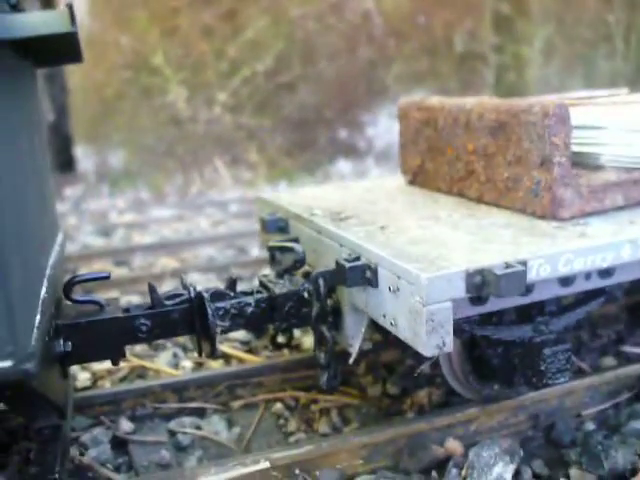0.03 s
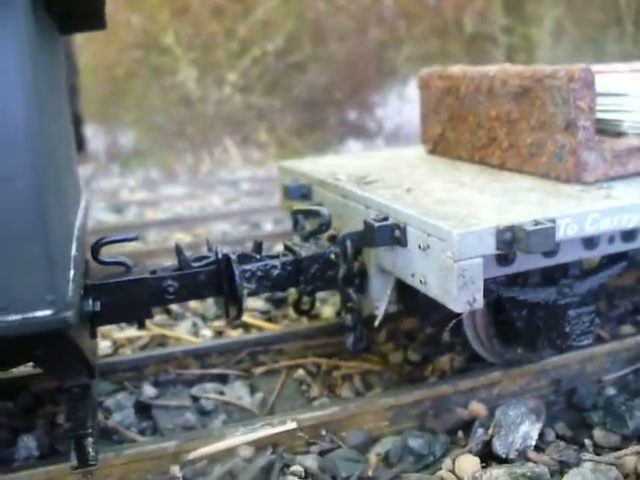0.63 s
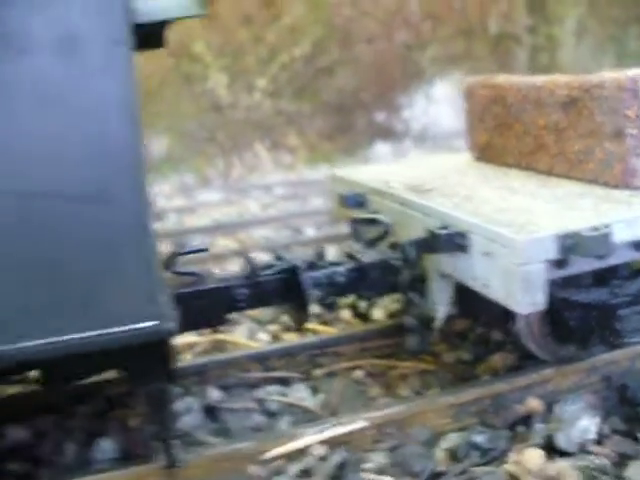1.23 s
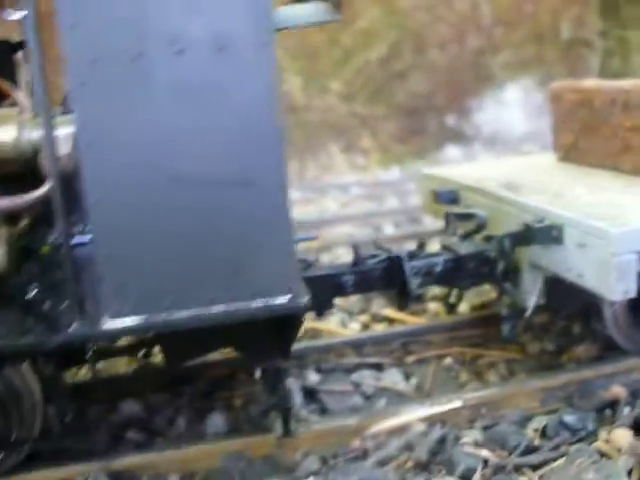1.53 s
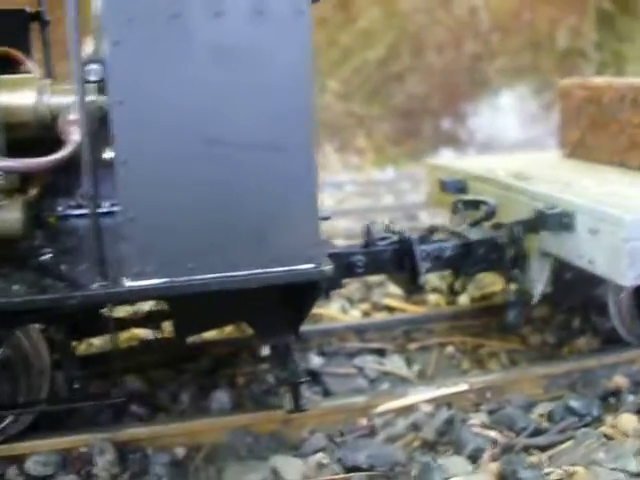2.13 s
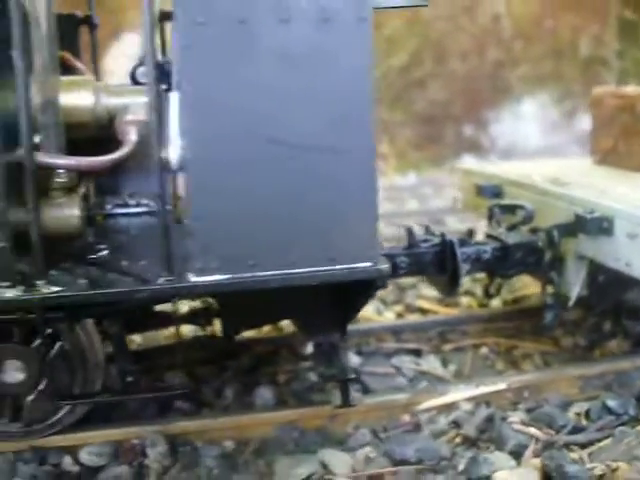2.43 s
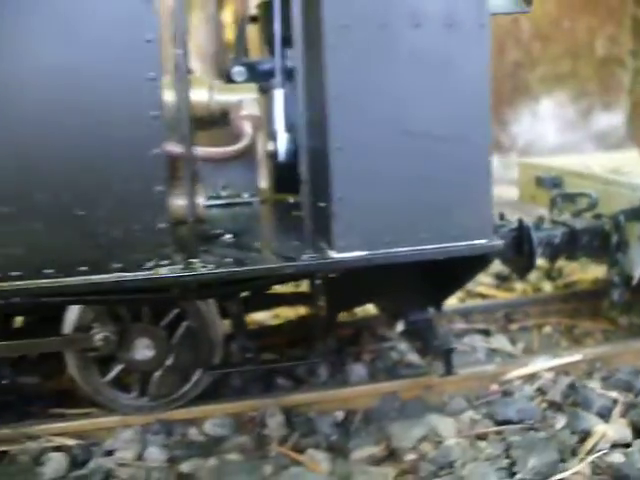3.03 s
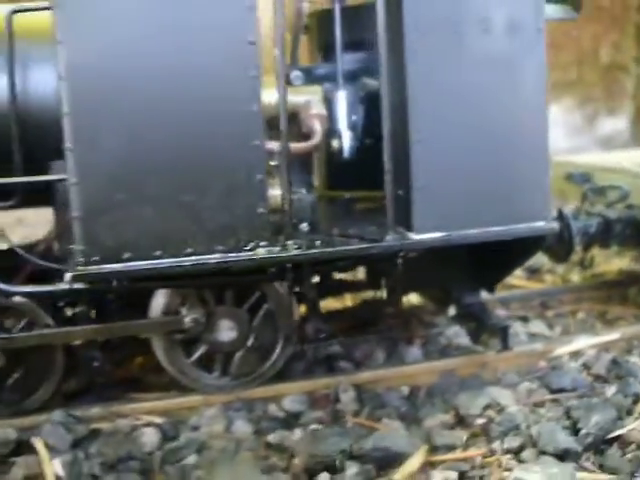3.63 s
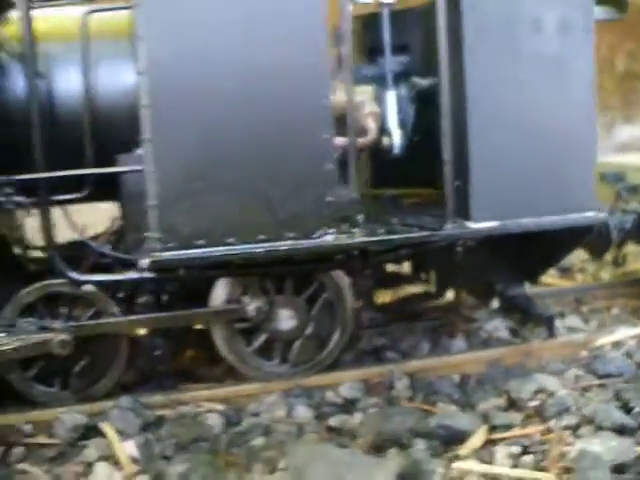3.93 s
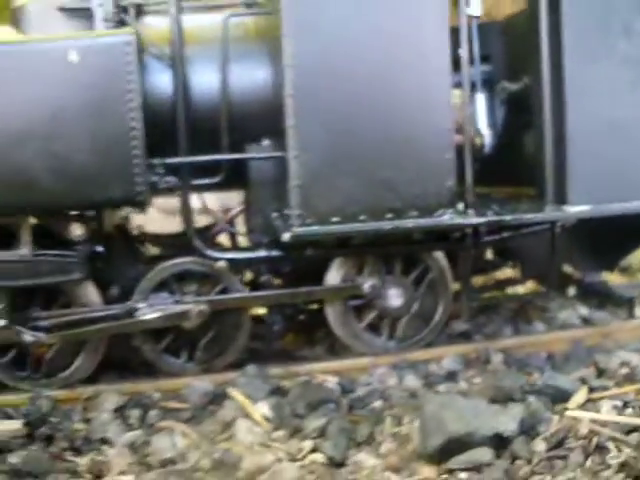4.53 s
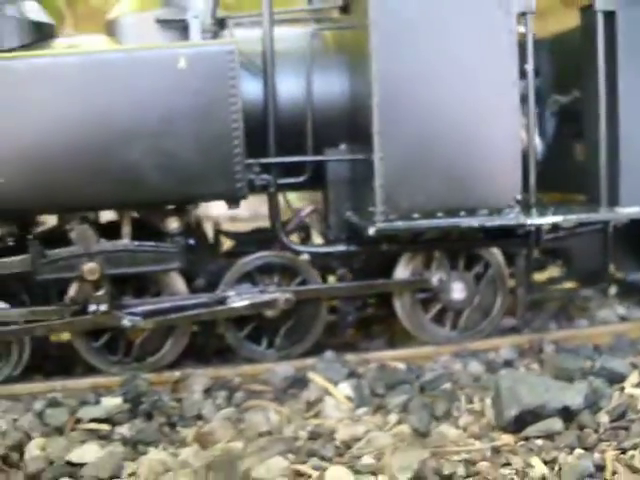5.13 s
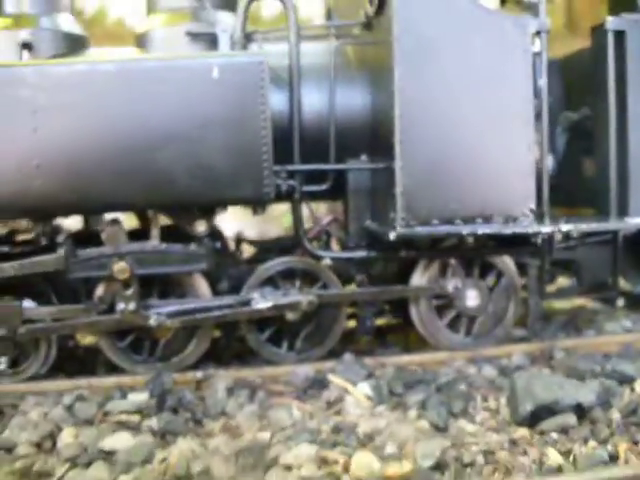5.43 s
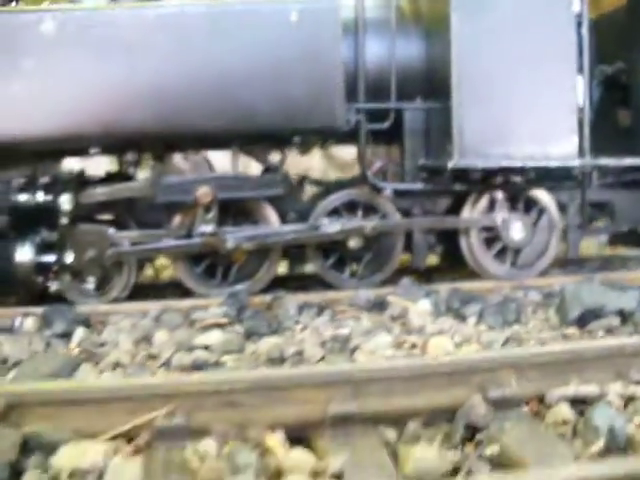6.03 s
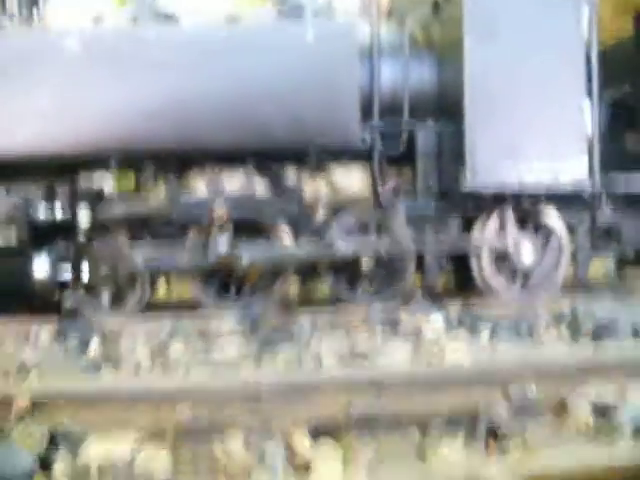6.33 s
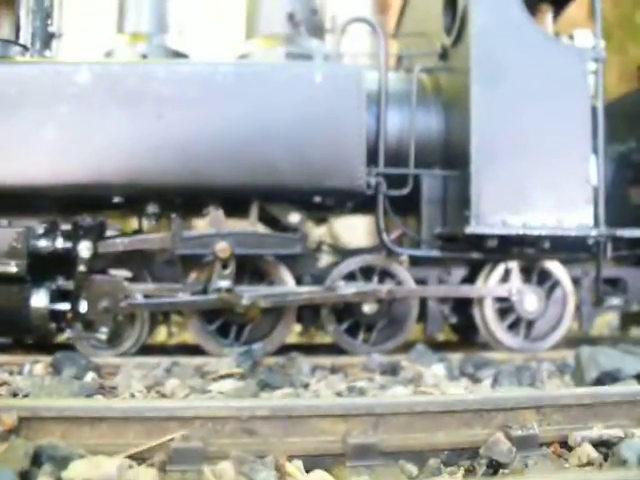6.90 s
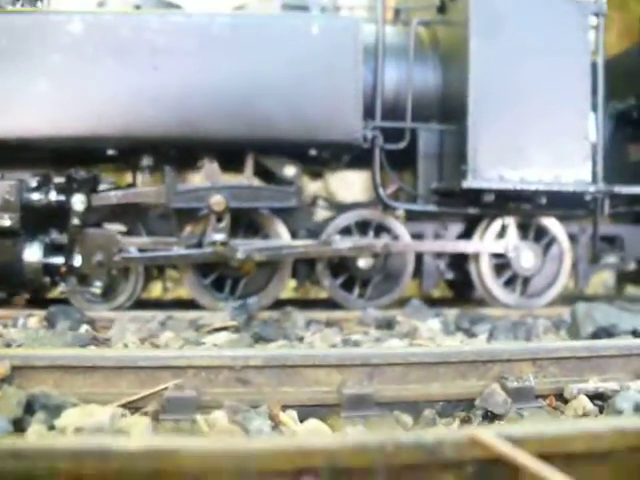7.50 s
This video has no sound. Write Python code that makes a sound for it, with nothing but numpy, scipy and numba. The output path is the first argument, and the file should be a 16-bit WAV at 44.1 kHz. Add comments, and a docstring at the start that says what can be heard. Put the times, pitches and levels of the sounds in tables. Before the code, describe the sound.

Steady hollow hum and faint hiss from a small steam engine's gas flame, with some rustling, then sharp handling clicks late on.

```python
"""A gas flame roars and hums in a live-steam model locomotive standing on a garden track.
The flame's turbulence sets the boiler flue humming in its first two modes, over a faint gas hiss.
A small hand-held camera moves alongside: cloth rustles, and the engine's hot metal ticks as it expands.
Near the end the camera is knocked and its case clicks; the hardest knock overloads it and ducks its gain.
"""
import sys
import numpy as np
from scipy import signal
from scipy.fft import rfft, irfft, next_fast_len
from scipy.io import wavfile
from scipy.ndimage import uniform_filter1d, minimum_filter1d
from numba import njit

SR = 44100
rng = np.random.default_rng(int(sys.argv[2]) if len(sys.argv) > 2 else 0)


def unload_audio(sound):
    """Save the sound as a 16-bit wav file, at the path given as the first command line argument."""
    columns = np.transpose(np.atleast_2d(sound))
    # keep every value between -1 and 1, then stretch to whole-number steps
    steps = np.round(np.clip(columns, -1, 1) * 32767)
    wavfile.write(sys.argv[1], SR, steps.astype(np.int16))


N = 342216
TIME_S = np.arange(N) / SR


def from_db(db):
    """Decibels to gain."""
    return 10 ** (np.asarray(db) / 20)


def unit_rms(x):
    """Scale to unit power."""
    return x / np.sqrt(np.mean(x ** 2) + 1e-20)


def curves(rows):
    """Interpolate (time, values...) rows to one per-sample curve per value column."""
    times_s, *columns = np.transpose(rows)
    return [np.interp(TIME_S, times_s, column) for column in columns]


def low_pass(x, hz, order):
    """Butterworth low-pass."""
    return signal.sosfilt(signal.butter(order, min(hz, .45 * SR), fs=SR, output="sos"), x)


def drift(rate_hz):
    """Slow random wander, unit RMS."""
    return unit_rms(low_pass(rng.standard_normal(N + SR), rate_hz, order=2)[SR:])


def turbulence(spectrum):
    """Unit-RMS noise with the given spectrum, rolled off beyond its ends."""
    hz, db = np.transpose(spectrum)
    size = next_fast_len(N)
    bins_hz = np.maximum(np.fft.rfftfreq(size, 1 / SR), 1)
    gain = from_db(np.interp(np.log(bins_hz), np.log(hz), db))
    skirts = np.minimum(bins_hz / hz[0], 1) * np.minimum(hz[-1] / bins_hz, 1) ** 2
    white = rfft(rng.standard_normal(size))
    return unit_rms(irfft(white * gain * skirts, size)[:N])


@njit
def resonator(x, angle_rad, radius):
    """Two-pole band-pass with a moving centre."""
    y = np.zeros(len(x))
    for i in range(2, len(x)):
        y[i] = x[i] - x[i - 2] + 2 * radius * np.cos(angle_rad[i]) * y[i - 1] - radius ** 2 * y[i - 2]
    return y


def air_mode(hz, width_hz, reach_hz, saturation=0):
    """Unit-RMS air resonance driven by turbulence within +/- reach_hz; saturation 0-1 flattens swells."""
    centre_hz = np.mean(hz)
    band_hz = [max(centre_hz - reach_hz, 20), centre_hz + reach_hz]
    drive = signal.sosfilt(signal.butter(2, band_hz, "band", fs=SR, output="sos"), rng.standard_normal(N))
    angle_rad = 2 * np.pi * hz / SR * np.ones(N)
    tone = unit_rms(resonator(drive, angle_rad, radius=np.exp(-np.pi * width_hz / SR)))
    envelope = np.sqrt(uniform_filter1d(tone ** 2, size=SR // 16) + 1e-9)
    return unit_rms(tone / envelope ** saturation)


def impulse(time_s, db):
    """Single-sample force pulse."""
    return from_db(db) * (np.arange(N) == round(time_s * SR)) + 1e-18


def ring(force, modes):
    """Each mode answers an impulse with a decaying sine; neighbours alternate in sign."""
    out = np.zeros(N)
    for k, (hz, db, t60_s) in enumerate(modes):
        radius = np.exp(-np.log(1000) / (t60_s * SR))
        angle_rad = 2 * np.pi * hz / SR
        feedback = [1, -2 * radius * np.cos(angle_rad), radius ** 2]
        out += (-1) ** k * from_db(db) * signal.lfilter([0, np.sin(angle_rad)], feedback, force)
    return out


# burner from the moving camera, before trims: (time [s], hum [dB], overtone [dB], roar [dB], boom [dB])
BURNER_LEVELS = [(0, -25.5, -39.5, -34, -40), (0.85, -25.3, -38.5, -30.5, -34.5), (1.6, -23, -38, -32, -40),
                 (2.7, -22.5, -37, -30, -38), (3.6, -22, -36.5, -30.5, -34.5),
                 (4.2, -21.5, -37.5, -31.5, -37), (5.1, -23.5, -40.5, -31.5, -40.5),
                 (5.8, -22, -40.3, -32, -41.5), (6.9, -21.5, -39, -32.5, -38.5),
                 (7.76, -23.5, -36.5, -32.5, -38.5)]
# deep rumble under the roar: (time [s], level [dB])
RUMBLE_LEVELS = [(0, -59.5), (1.0, -57.5), (1.9, -41.5), (2.7, -42.5), (3.2, -63), (4.4, -45), (5.1, -60.5),
                 (7.76, -48.5)]
# boiler flue modes: (time [s], first mode [Hz], second mode [Hz])
FLUE_MODES = [(0, 746, 1438), (1.2, 737, 1451), (2.0, 742, 1475), (3.5, 729, 1502), (4.5, 733, 1471),
              (6.0, 739, 1441), (7.76, 737, 1463)]
# flame roar: (frequency [Hz], relative density [dB])
ROAR_SPECTRUM = [(25, -24), (70, -24.5), (105, -21.5), (135, -15.5), (160, -5), (260, 0.5), (330, 0.5),
                 (450, 1.5), (560, -2.5), (860, -20), (1040, -8), (1350, -10), (1700, -29), (2200, -36.5)]


def burner(flutter_db=1.55, surge_db=1.08, hum_trim_db=-0.5, roar_trim_db=-1.0):
    """The fluttering flame roars, booms in the hollow body and drives two flue modes; the first surges."""
    hum_db, overtone_db, roar_db, boom_db = curves(BURNER_LEVELS)
    rumble_db, = curves(RUMBLE_LEVELS)
    first_hz, second_hz = curves(FLUE_MODES)
    hum_gain = from_db(hum_db + hum_trim_db + surge_db * drift(rate_hz=8.8))
    hum = hum_gain * air_mode(first_hz, width_hz=33.4, reach_hz=191, saturation=0.2)
    overtone = from_db(overtone_db) * air_mode(second_hz, width_hz=72, reach_hz=240, saturation=0.025)
    boom = from_db(boom_db) * air_mode(hz=217.1, width_hz=22, reach_hz=89, saturation=0.1)
    roar = from_db(roar_db + roar_trim_db) * turbulence(ROAR_SPECTRUM)
    rumble = from_db(rumble_db) * air_mode(hz=154.5, width_hz=31, reach_hz=35)
    flutter = from_db(flutter_db * drift(rate_hz=30))
    return (hum + overtone + boom + roar + rumble) * flutter


# jet sound let out by the open cab: (time [s], level [dB])
CAB_LEVELS = [(0, -61), (0.7, -67.5), (1.9, -57), (2.9, -57.5), (3.6, -57), (4.25, -58), (4.7, -69.5),
              (5.3, -70), (6.0, -73), (7.76, -65)]
# gas hiss: (frequency [Hz], relative density [dB])
JET_SPECTRUM = [(900, -3.5), (1700, -4.5), (2100, 2), (2600, 3.5), (2850, 0.5), (3080, 4.5), (3350, -2),
                (3800, 0), (4300, -12.5)]
# breathy whistles of jet and mixing tube: (frequency [Hz], width [Hz], level re cab [dB])
JET_WHISTLES = [(1740, 620, 4), (2866, 67, -6), (3104, 45, -3.5)]


def gas_jet(hiss_floor_db=-56.5, sputter_db=1.25):
    """Gas leaves the jet with a thin, uneven hiss; hiss and whistles carry best out of the open cab."""
    cab_gain = from_db(curves(CAB_LEVELS)[0])
    hiss = np.hypot(from_db(hiss_floor_db), cab_gain) * turbulence(JET_SPECTRUM)
    whistles = sum(from_db(db) * air_mode(hz, width_hz, reach_hz=250) for hz, width_hz, db in JET_WHISTLES)
    sputter = from_db(sputter_db * drift(rate_hz=60))
    return (hiss + cab_gain * whistles) * sputter


# cloth sliding as the camera moves: (peak time [s], level [dB], swell [s], fade [s])
CLOTH_SLIDES = [(1.15, -43.5, .08, 0.45), (1.315, -37, 0.29, 0.23), (1.40, -44, .1, 0.64),
                (4.24, -54.5, 0.68, .35), (5.21, -54.5, .2, .25), (6.49, -45, 0.35, .04),
                (6.76, -51.5, .1, .05), (7.52, -43.5, 0.3, .22)]
# cloth rustle: (frequency [Hz], relative density [dB])
CLOTH_SPECTRUM = [(1200, -24), (1850, -6), (2170, 2), (2600, -2), (2950, -4.5), (3250, -0.5), (3480, 4),
                  (3760, -7.5), (4300, -16.5)]


def cloth(range_db=31.5, grain_db=1.7):
    """Sliding fabric catches and slips; each slide moves by range_db over its swell or fade time."""
    power = 0
    for peak_s, db, swell_s, fade_s in CLOTH_SLIDES:
        from_peak = np.maximum((peak_s - TIME_S) / swell_s, (TIME_S - peak_s) / fade_s)
        power += from_db(db - range_db * np.minimum(from_peak, 4)) ** 2
    grain = from_db(grain_db * drift(rate_hz=70))
    return np.sqrt(power) * grain * turbulence(CLOTH_SPECTRUM)


# expansion ticks: (time [s], force [dB])
METAL_TICKS = [(1.938, -43), (2.4534, -42), (2.957, -40), (3.322, -40.5)]
# hot metal parts: (frequency [Hz], gain [dB], T60 [s])
METAL_MODES = [(2450, -9, 0.022), (2800, -3, 0.041), (2960, -1, 0.047), (3350, -4, .015)]


def hot_metal():
    """Heated parts expand and slip with small ticks."""
    return ring(sum(impulse(time_s, db) for time_s, db in METAL_TICKS), METAL_MODES)


# knocks on the camera: (time [s], force [dB], contact low-pass [Hz])
BODY_KNOCKS = [(6.4941, 9, 2970), (6.4953, -4, 3000), (6.765, -13, 148), (7.1923, -17, 2080),
               (7.7542, -2, 1200)]
# camera body: (frequency [Hz], gain [dB], T60 [s])
BODY_MODES = [(55, -36.5, 0.076), (170, -4.5, 0.011), (425, -4, 0.007), (694, -3, 0.0041),
              (1307, 1.5, 0.0049), (1547, -2.5, 0.0046), (2110, -47, 0.36), (2470, -9, 0.0055),
              (3000, -22, 0.043), (3950, 0.5, 0.0037)]


def body_knocks():
    """Knocks shake the whole camera body, duller when the contact is soft."""
    force = sum(low_pass(impulse(time_s, db), hz, order=1) for time_s, db, hz in BODY_KNOCKS)
    return ring(force, BODY_MODES)


# handling clicks: (time [s], force [dB])
CASE_CLICKS = [(6.9564, -25), (7.0766, -30), (7.1564, -2), (7.169, -16), (7.1842, -8.5), (7.189, 0),
               (7.194, -21), (7.563, -26.5), (7.7542, -1)]
# camera case: (frequency [Hz], gain [dB], T60 [s])
CASE_MODES = [(1200, -15, 0.0046), (1740, -12.5, 0.0093), (2680, -11.5, 0.008), (3055, -16, 0.024),
              (3440, -5.5, .007), (4040, -9.5, 0.0035)]


def case_clicks():
    """Sharp clicks ring the camera case."""
    return ring(sum(impulse(time_s, db) for time_s, db in CASE_CLICKS), CASE_MODES)


def scene():
    """Mono mix; close sources in open air, no reverberation."""
    return (burner() + gas_jet() + cloth() + hot_metal() + body_knocks() + case_clicks())[None]


def gain_control(x, threshold_db=-6, attack_s=0.0051, hold_s=0.026, release_s=0.034):
    """A peak over the threshold pulls the gain down; it holds, then recovers."""
    excess_db = np.maximum(20 * np.log10(np.abs(x) + 1e-9) - threshold_db, 1e-6)
    half_hold = int(hold_s * SR / 2)
    held_db = -minimum_filter1d(-excess_db, size=2 * half_hold + 1, origin=half_hold)
    decay = TIME_S / release_s
    released_db = np.exp(np.maximum.accumulate(np.log(held_db) + decay) - decay)   # decaying peak hold
    attack_pole = np.exp(-1 / (attack_s * SR))
    duck_db = signal.lfilter([1 - attack_pole], [1, -attack_pole], released_db)
    return x * from_db(-duck_db)


def record(dry, band_hz=3897, self_noise_db=-59, input_limit=0.79, output_limit=0.7, dc_offset=0.029):
    """Narrow-band camera microphone with gain control, faint hiss, overload and a small DC offset."""
    self_noise = from_db(self_noise_db) * unit_rms(low_pass(rng.standard_normal(N), band_hz, order=12))
    overloaded = np.clip(gain_control(dry[0]), -input_limit, input_limit)
    narrow = low_pass(overloaded, band_hz, order=12) + self_noise
    band_edge = signal.ellip(8, .2, 80, 4200, fs=SR, output="sos")   # steep low-pass, 4200 Hz
    narrow = signal.sosfilt(band_edge, narrow)
    # flattened peaks splash far above the microphone's band
    clipped = np.clip(narrow + dc_offset, -output_limit, output_limit)
    return low_pass(clipped, hz=15800, order=16)[None]


dry = scene()
out = record(dry)
unload_audio(out)
```